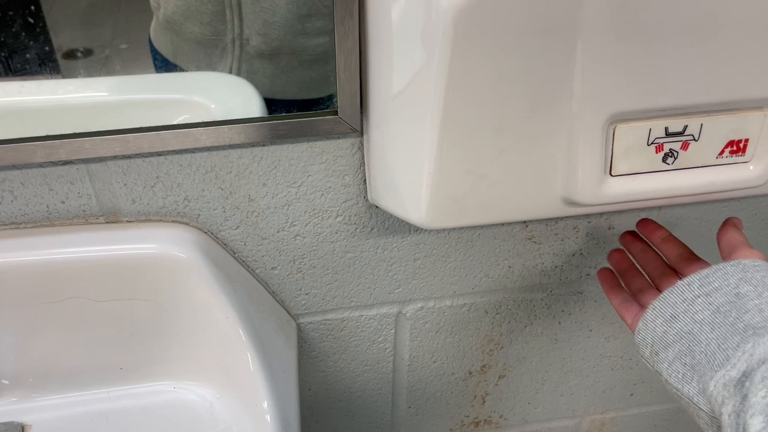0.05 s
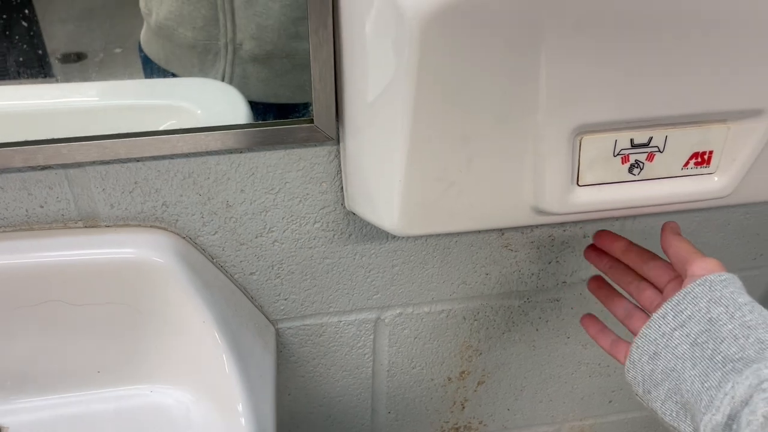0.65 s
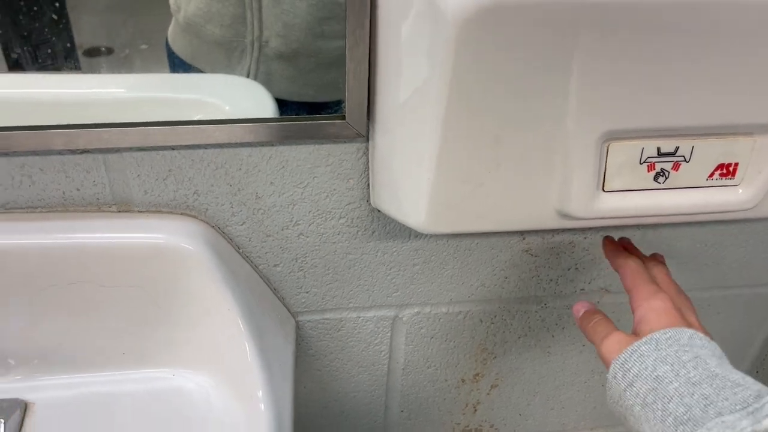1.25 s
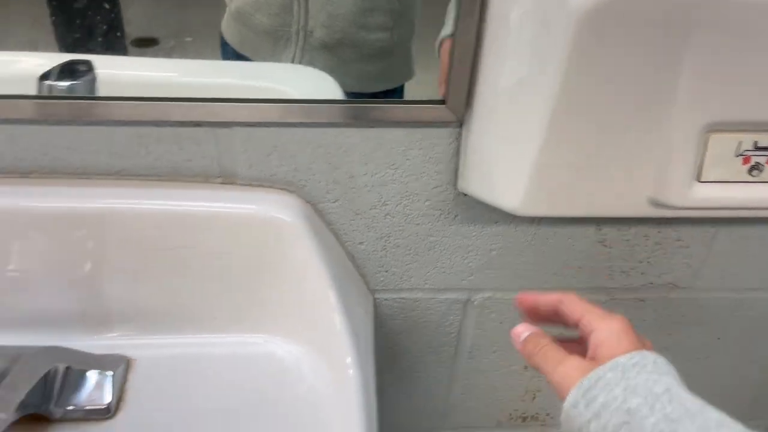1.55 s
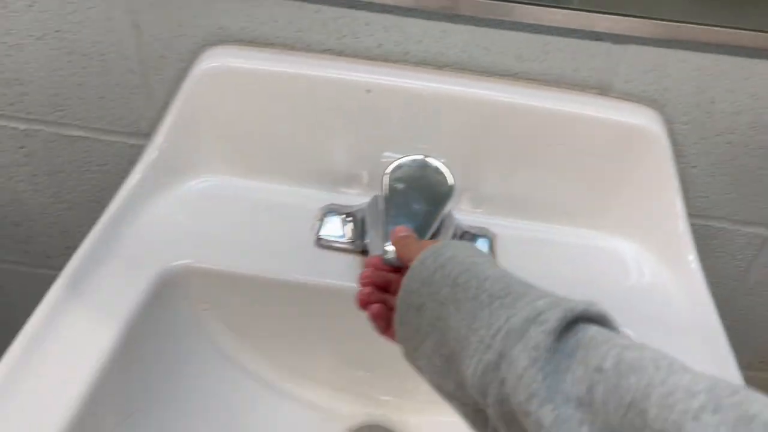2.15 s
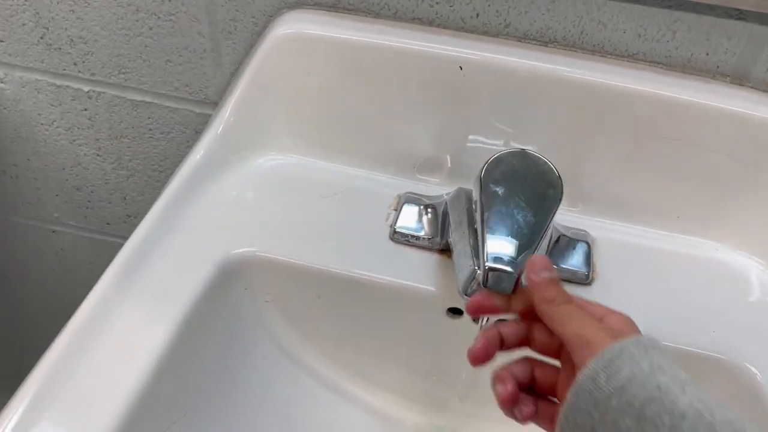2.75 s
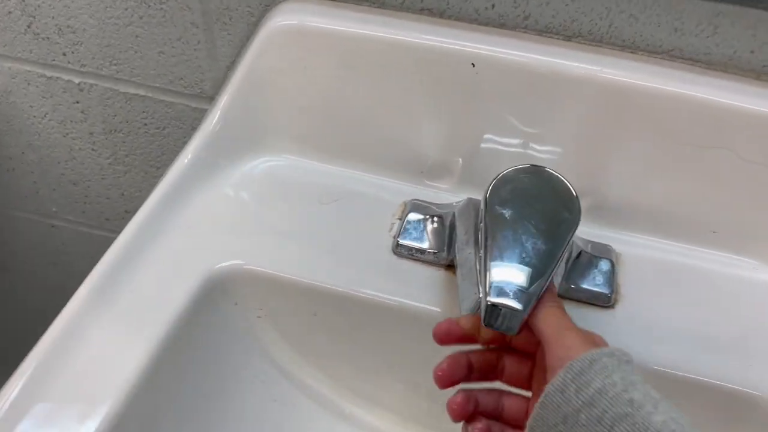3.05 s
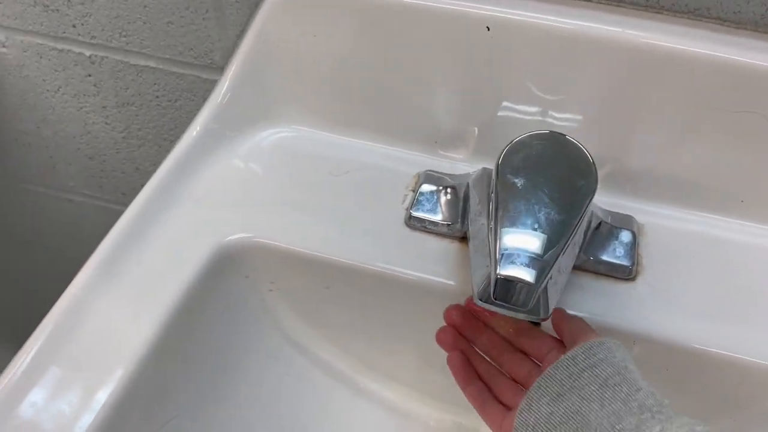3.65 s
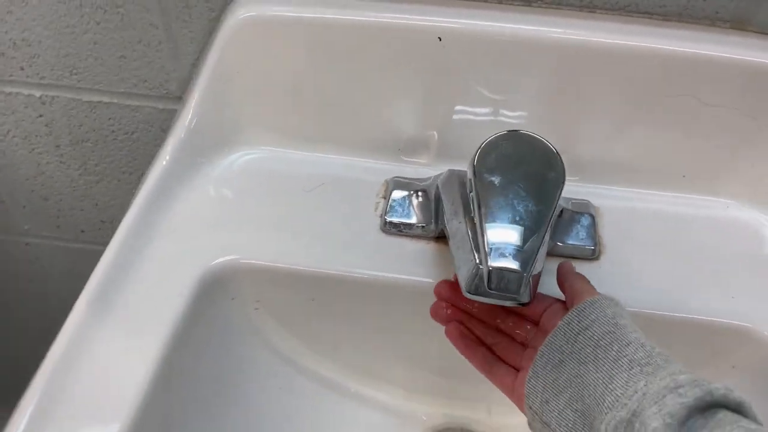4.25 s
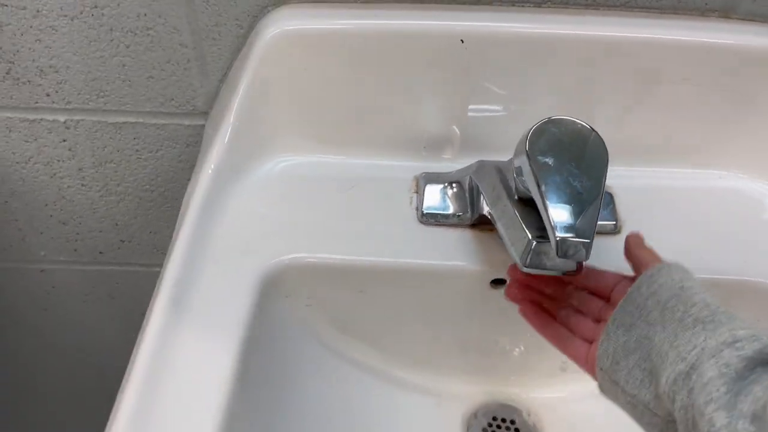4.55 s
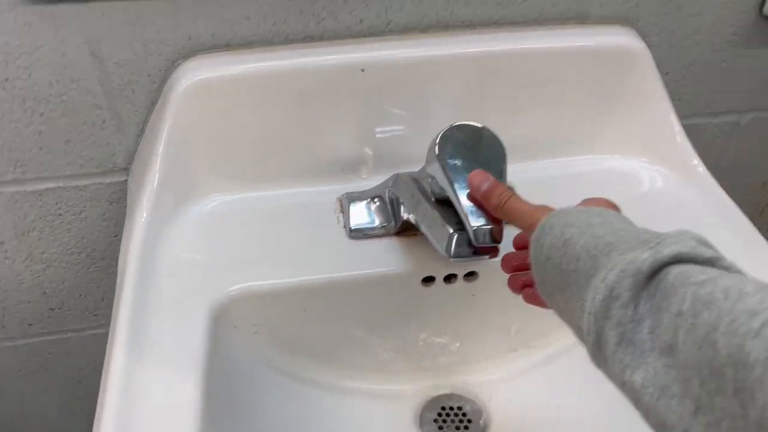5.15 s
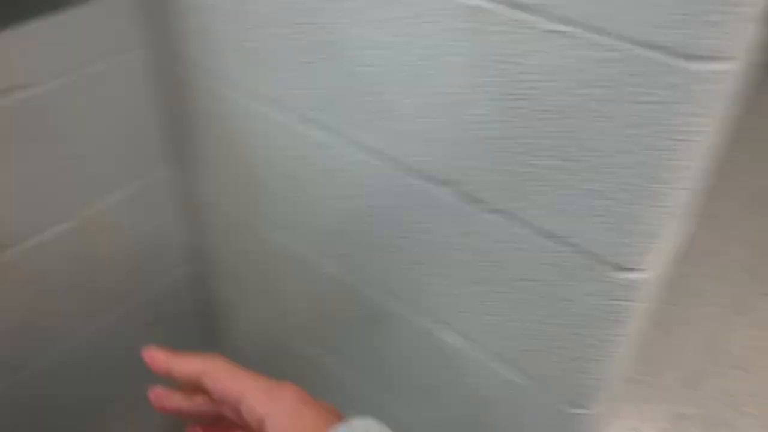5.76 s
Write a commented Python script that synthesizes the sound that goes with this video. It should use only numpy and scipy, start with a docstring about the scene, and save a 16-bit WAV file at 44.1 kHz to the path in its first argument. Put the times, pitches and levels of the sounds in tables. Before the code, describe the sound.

A wall-mounted hand dryer runs in a tiled restroom, a loud steady roar of air with a piercing whine and motor hum. The tones swell and fade as the microphone moves to the sink. After about four seconds the power cuts and the fan winds down, falling in pitch. A tap hisses faintly for a moment, and a few soft low bumps jolt the microphone near the end.

```python
"""A hand dryer roars in a tiled restroom: turbulent air, a whine from 24 fan blades, motor hum and buzz.
The tones swell and fade as the microphone crosses standing waves on its way to the sink.
At 4.4 s the power cuts; the fan coasts down and its tones slide through room and housing resonances.
A tap hisses briefly through its aerator; a few low bumps jolt the microphone as its holder turns to go."""
import sys
import numpy as np
from scipy import signal
from scipy.fft import rfft, irfft
from scipy.io import wavfile
from scipy.ndimage import uniform_filter1d

SR = 44100
rng = np.random.default_rng(int(sys.argv[2]) if len(sys.argv) > 2 else 0)


def persist_wave(psi):
    """Save psi, clipped to +-1, as 16-bit WAV."""
    counts = np.round(np.clip(psi, -1, 1) * 32767).astype(np.int16)
    wavfile.write(sys.argv[1], SR, np.atleast_2d(counts).T)


N = 265041
TIME = np.arange(N) / SR
BLADES = 24
POWER_OFF_S, MOVE_START_S, MOVE_END_S, LEAVE_S = 4.405, 1.38, 2.1, 5.9

# air spectrum, full speed: f/Hz, relative level/dB
ROAR_DB = [(25, -44), (50, -15), (110, -3), (230, -2), (700, -2.5), (900, -3), (1350, -4.5), (1800, -12.5),
           (3000, -6), (4800, -13), (6900, -15), (9600, -19), (11500, -25), (13500, -29)]
# air spectrum, nearly stopped: f/Hz, relative level/dB
DRAUGHT_DB = [(25, -40), (55, -10), (90, -8), (150, -16), (300, -8), (700, -15.5), (1250, -16),
              (1700, -21.5), (2600, -24.5), (3600, -22), (5000, -29), (8300, -35), (10500, -33),
              (13500, -47)]
# room and housing resonances, full speed: f/Hz, width/Hz, gain/dB
ROAR_PEAKS = [(94.6, 7.5, 6), (109.5, 14.5, -10.5), (177, 14.6, -4), (192, 7.5, 7), (213, 15, -4),
              (265.5, 16, 5), (284, 9.5, 1), (394, 14, 5), (453, 53, 3), (890, 83, 2), (3290, 120, -1),
              (3600, 170, 3), (4060, 110, 3.5)]
# room and duct resonances, nearly stopped: f/Hz, width/Hz, gain/dB
DRAUGHT_PEAKS = [(140, 20, 6.5), (385, 30, -4), (1980, 260, 6), (2980, 470, 6.5), (3930, 200, 4),
                 (4270, 150, 4), (5740, 930, 7), (9300, 820, 6)]
# housing peaks and dips, any speed: f/Hz, width/Hz, gain/dB
HOUSING_PEAKS = [(430, 40, 2.5), (560, 90, 1.5), (685, 60, -3), (885, 50, 1.5), (1090, 35, 2),
                 (1185, 70, -3.5), (1255, 50, 3.5), (1345, 60, 1.5), (1435, 40, 3.5)]
# air colour change at the sink: f/Hz, gain/dB
SINK_TINT_DB = [(200, 0), (290, 0), (430, -2.5), (600, 0.5), (900, 0.85), (1800, -1), (4000, -1.5),
                (6500, 1.7), (12000, -0.5)]
# shaft speed under power: t/s, f/Hz
SHAFT_HZ = [(0, 143.85), (.3, 144.12), (.8, 144.12), (1.35, 144.0), (1.55, 143.9), (2.0, 143.85),
            (2.7, 144.05), (3.2, 143.95), (4.4, 143.95)]
# blade tone across standing waves: t/s, level/dB
WHINE_DB = [(0.0, -23.5), (0.22, -30.5), (0.27, -44), (0.37, -32), (0.44, -42), (0.76, -29), (0.95, -32),
            (1.06, -25), (1.18, -29.5), (1.45, -24), (1.56, -18.5), (1.73, -31.5), (1.96, -38.5),
            (2.08, -31), (2.17, -28), (2.31, -39), (2.46, -29), (2.56, -40), (2.82, -31), (2.86, -38.5),
            (2.96, -31.5), (3.03, -37), (3.17, -29), (3.32, -26.5), (3.95, -26.5), (4.03, -36.5),
            (4.42, -36.5)]
# blade tone balance: t/s, left-right/dB
WHINE_PAN_DB = [(0.0, 0), (1.35, -4.5), (1.77, 16), (1.83, 21), (2.29, -1), (2.33, 4), (3.98, 1),
                (4.04, 26), (4.42, 21)]
# ninth shaft harmonic, singing in the housing: t/s, level/dB
SING_DB = [(0, -37), (.25, -37), (.8, -42), (1.05, -36.5), (1.3, -34), (1.6, -37.5), (2.0, -51),
           (2.3, -40.5), (2.55, -45), (2.8, -41), (3.05, -46), (3.85, -48), (4.4, -44)]
# shaft harmonic envelope: f/Hz, level/dB
COMB_DB = [(430, -55), (1100, -60), (1800, -63), (2600, -68), (3900, -50), (4600, -68), (5800, -52.5),
           (7400, -66), (9500, -59), (11000, -70)]
# prominent shaft harmonics: order, dryer level/dB, sink level/dB
STRONG_HARMONICS = [(4, -52, -46), (5, -45.5, -50), (6, -44.5, -43.5), (13, -55, -57), (23, -51, -52),
                    (25, -53, -55), (28, -52, -55), (29, -47, -52), (33, -52, -58), (37, -52, -58),
                    (42, -50, -54), (45, -53, -45), (46, -50, -60), (74, -59, -59)]
# lower buzz tone across standing waves: t/s, level/dB
LOW_BUZZ_DB = [(0, -44), (.2, -38), (.45, -48), (.9, -36), (1.2, -41), (1.9, -42), (2.05, -36.5),
               (2.17, -36.5), (2.27, -47), (2.42, -35), (2.65, -34), (2.95, -41.5), (3.9, -38), (4.13, -51),
               (4.42, -35.5)]
# upper buzz tone, likewise: t/s, level/dB
HIGH_BUZZ_DB = [(0, -52), (.55, -44), (1.55, -48), (1.8, -39.5), (2.0, -47), (2.17, -39), (2.5, -48),
                (2.73, -39.5), (2.9, -53), (3.38, -53), (3.55, -38.5), (3.73, -45), (3.92, -38.5),
                (4.4, -50)]
# room and housing resonances swept while coasting: f/Hz, width per pass/Hz, gain/dB
SWEPT_PEAKS = [(86, 3, 10.5), (94.5, 4, 11), (135, 8, 4), (1320, 105, 2), (2830, 150, 3.5), (3230, 720, 6)]
# tap stream: t/s, level/dB
TAP_DB = [(4.5, -90), (4.68, -48.5), (5.0, -49.5), (5.25, -53), (5.5, -58), (5.7, -90)]
# aerator hiss bands: f/Hz, base width/Hz, relative level/dB
AERATOR_BANDS = [(4320, 150, 2.5), (5770, 400, -4), (6670, 250, -5)]
# microphone bumps: t/s, envelope peak/dB, f/Hz
JOLTS = [(5.603, -37, 60), (5.669, -37, 75), (5.725, -33, 58), (5.752, -34, 80), (5.809, -35, 80),
         (5.842, -44, 65), (5.875, -42, 60)]
# microphone pair likeness: f/Hz, coherence/0-1
PAIR_COHERENCE = [(60, .97), (160, .93), (300, .58), (700, .3), (1700, .33), (2400, .65), (4600, .74),
                  (6000, .4), (7200, .93), (10500, .9), (13500, .7)]
# microphone pair phase: f/Hz, left lead/rad
PAIR_LEAD_RAD = [(60, 0), (200, -.1), (600, -.9), (1500, -1.0), (2200, .2), (3000, .8), (4300, 0),
                 (5300, -.2), (6200, -1.7), (6800, -2.9), (7600, -3.2), (8400, -3.9), (10500, -6.1),
                 (12000, -6.5), (13500, -8.8)]
# microphone pair balance: f/Hz, left-right/dB
PAIR_BALANCE_DB = [(60, 3), (95, -1), (135, -12), (220, 0), (360, 3.5), (700, 0), (1200, 2), (1800, 1),
                   (2500, 3.5), (6400, 4), (6900, -2), (13000, 1)]


def air(ripple_db=1.5, eddy_db=0.5, flutter_db=0.57, calm_speed=0.17):
    """Turbulent air from the nozzle fills the room; it turns hollow as the fan slows."""
    frames, hz = N // 1024 + 5, np.fft.rfftfreq(4096, 1 / SR)
    t = np.arange(frames) * 1024 / SR
    slowed = np.clip((1 - coasting(t)) / (1 - calm_speed), 0, 1)[:, None]
    roar_db = at_hz(ROAR_DB, hz) + peaks_db(ROAR_PEAKS, hz)
    draught_db = at_hz(DRAUGHT_DB, hz) + peaks_db(DRAUGHT_PEAKS, hz)
    colour_db = (1 - slowed) * roar_db + slowed * draught_db + peaks_db(HOUSING_PEAKS, hz)
    colour_db += by_place(0, 1, t)[:, None] * at_hz(SINK_TINT_DB, hz)
    # standing waves: fine, slow ripples; eddies: broad, brief patches
    ripples, eddies = rng.standard_normal((2, frames, len(hz)))
    colour_db += ripple_db * blur(ripples, frames=40, bins=2)
    colour_db += eddy_db * blur(eddies, frames=3, bins=60)
    shape = gain(colour_db)
    shape /= np.linalg.norm(shape[:, (hz > 300) & (hz < 2600)], axis=1, keepdims=True)
    real, imag = rng.standard_normal((2, 2, len(hz), frames))
    noise = signal.istft((real + 1j * imag) * shape.T, nperseg=4096, noverlap=3072)[1][:, :N]
    return mic_pair(*noise) * gain(air_gain_db() + flutter_db * drift(49))


def air_gain_db(db_per_decade=33.5, leave_db_per_s=17, room_lag_s=0.019):
    """The air weakens with distance and falling fan speed; the room holds it a moment."""
    slowing_db = db_per_decade * np.log10(coasting(TIME - room_lag_s))
    leaving_db = leave_db_per_s * np.maximum(TIME - LEAVE_S, 0)
    return by_place(dryer=-23.5, sink=-26) + slowing_db - leaving_db


def whine(turns, stray_db=-36, linger_db=-41):
    """Blades pass the housing: one piercing tone, shaken by the turbulent intake."""
    cycles = BLADES * turns
    balance = pan(at_time(WHINE_PAN_DB))
    direct = gain(at_time(WHINE_DB)) * balance / balance.mean(0) * room_tone(cycles, 0.15, rate_hz=28)
    # side-wall reflections arrive in antiphase
    stray = gain(stray_db) * room_tone(cycles, 5.6, rate_hz=4.3)[0] * np.array([[1], [-1]])
    linger = gain(linger_db) * room_tone(cycles, 0.79, rate_hz=8.2) * after_cut(rise_s=0.075)
    return (direct + stray + linger) * ring_out(t60_s=1.55)


def motor(turns, mains_hz=60):
    """Rotor hum once a turn, shaft harmonics, and magnetic buzz at multiples of the mains rate."""
    hum_db = by_place(dryer=-29, sink=-36.5)
    hum = gain(hum_db) * room_tone(turns, 0.12, rate_hz=7)[0] * pan(-0.5)
    sing = gain(at_time(SING_DB)) * room_tone(9 * turns, 0.6, rate_hz=24) * pan(4)
    buzz = sum(gain(at_time(curve)) * room_tone(order * mains_hz * TIME, 0.2, rate_hz=3)
               for order, curve in ((4, LOW_BUZZ_DB), (10, HIGH_BUZZ_DB)))
    comb = mic_pair(*shaft_comb(turns))
    return (hum + sing + comb) * ring_out(t60_s=1.2) + buzz * ring_out(t60_s=0.8)


def shaft_comb(turns):
    """Shaft harmonics 3-75 without the blade tone; the low ones waver slowest."""
    strong_db = {order: by_place(dryer, sink) for order, dryer, sink in STRONG_HARMONICS}
    comb = np.zeros((2, N))
    for order in range(3, 76):
        if order != BLADES:
            level_db = strong_db.get(order, at_hz(COMB_DB, order * SHAFT_HZ[0][1]))
            comb += gain(level_db) * room_tone(order * turns, 0.6, rate_hz=min(order / 2, 9))
    return comb


def wind_down(turns, direct_db=-39, walls_db=-37.5, hum_db=-36.5, hum_db_per_decade=28):
    """Blade tone, 15th harmonic and hum slide down and fade, swelling where they cross a resonance."""
    speed, onset = coasting(TIME), after_cut(rise_s=0.011)
    blade, lower = (room_tone(order * turns, 0.45, rate_hz=90)[0] for order in (BLADES, 15))
    slide = (blade + gain(-4) * lower) * onset * speed
    first, second = (room_tone(order * turns, 0.15, rate_hz=20)[0] for order in (1, 2))
    hum = (first + gain(-8) * second) * onset * gain(hum_db_per_decade * np.log10(speed))
    slide, hum = resonate(slide, SWEPT_PEAKS), resonate(hum, SWEPT_PEAKS)
    return gain(direct_db) * slide + gain(walls_db) * tiled_walls(slide) + gain(hum_db) * hum


def tap(spatter_db=1.0):
    """Water hisses through the aerator and spatters into the basin."""
    noise = rng.standard_normal((2, N)) * gain(spatter_db * drift(120))
    hiss = unit_rms(resonate(noise, AERATOR_BANDS, widen=1.4))
    return mic_pair(*hiss) * gain(at_time(TAP_DB))


def jolts(rise_s=0.0058):
    """Soft, low bumps through the microphone body."""
    bumps = np.zeros(N)
    for start_s, peak_db, hz in JOLTS:
        age_s = np.maximum(TIME - start_s, 0)
        envelope = age_s / rise_s * np.exp(1 - age_s / rise_s)
        bumps -= gain(peak_db) * envelope * np.sin(2 * np.pi * hz * age_s)
    return bumps


def tiled_walls(x, bass_t60_s=0.53, treble_t60_s=0.94):
    """Dense reflections of random sign, one tail per channel; the treble rings longer."""
    echoes = rng.choice([-1., 1.], (2, SR)) * (rng.random((2, SR)) < 0.06)
    hz, t, spectra = signal.stft(echoes, SR, nperseg=256)
    t60_s = at_hz([(300, bass_t60_s), (8000, treble_t60_s)], hz)[:, None]
    tail = signal.istft(spectra * gain(-60 * t / t60_s), SR, nperseg=256)[1]
    return signal.fftconvolve(x[None], tail / np.linalg.norm(tail[0]), axes=1)[:, :N]


def room_tone(cycles, scatter, rate_hz):
    """A direct tone plus shifting reflections of relative size scatter; two channels, unit rms."""
    phase = 2 * np.pi * (cycles + rng.random())
    cos, sin = np.cos(phase), np.sin(phase)
    return np.array([unit_rms(cos + scatter * (drift(rate_hz) * cos + drift(rate_hz) * sin))
                     for _ in range(2)])


def mic_pair(left, independent):
    """Two ports, most alike in bass and treble; phase and balance vary with frequency."""
    hz = np.fft.rfftfreq(N, 1 / SR)
    coherence = np.clip(at_hz(PAIR_COHERENCE, hz), 0, 1)
    left = rfft(left)
    right = coherence * left + np.sqrt(1 - coherence ** 2) * rfft(independent)
    right *= np.exp(-1j * at_hz(PAIR_LEAD_RAD, hz))
    return irfft(np.array([left, right]) * pan(at_hz(PAIR_BALANCE_DB, hz)), N)


def coasting(t, drag_halving_s=0.52, friction_per_s=0.045):
    """Fraction of full speed; air drag and friction brake the fan after the cut."""
    age_s = np.maximum(t - POWER_OFF_S, 0)
    return 1 / (1 + age_s / drag_halving_s) - friction_per_s * age_s


def ring_out(t60_s):
    """Room decay of a steady tone after the cut."""
    return gain(-60 * np.maximum(TIME - POWER_OFF_S, 0) / t60_s)


def after_cut(rise_s):
    """Fade-in from the power cut."""
    return np.clip((TIME - POWER_OFF_S) / rise_s, 0, 1)


def by_place(dryer, sink, t=TIME):
    """Crossfades a value as the microphone moves."""
    return np.interp(t, [MOVE_START_S, MOVE_END_S], [dryer, sink])


def resonate(x, bands, widen=1):
    """Parallel resonances, two passes each for steep skirts."""
    total = 0
    for hz, width_hz, db in bands:
        b, a = signal.iirpeak(hz, hz / (widen * width_hz), SR)
        total += gain(db) * signal.lfilter(b, a, signal.lfilter(b, a, x))
    return total


def peaks_db(rows, hz):
    """Sum of bell-shaped peaks and dips."""
    return sum(db / (1 + (2 * (hz - centre_hz) / width_hz) ** 2) for centre_hz, width_hz, db in rows)


def drift(rate_hz):
    """Random wander, unit rms, low-passed at rate_hz."""
    hz = np.fft.rfftfreq(4096, TIME[-1] / 4096)
    smooth = irfft(rfft(rng.standard_normal(4096)) / (1 + (hz / rate_hz) ** 4))
    return np.interp(TIME, np.linspace(0, TIME[-1], len(smooth)), unit_rms(smooth))


def blur(x, frames, bins):
    """Time-frequency smoothing to unit rms."""
    return unit_rms(uniform_filter1d(uniform_filter1d(x, frames, axis=0), bins, axis=1))


def at_hz(rows, hz):
    """Interpolates on a log-frequency axis."""
    knots_hz, values = np.transpose(rows)
    return np.interp(np.log(hz + 1), np.log(knots_hz + 1), values)


def at_time(rows):
    return np.interp(TIME, *np.transpose(rows))


def pan(left_right_db):
    return gain(np.array([[0.5], [-0.5]]) * left_right_db)


def gain(db):
    return 10 ** (np.asarray(db) / 20)


def unit_rms(x):
    return x / np.sqrt(np.mean(x ** 2) + 1e-20)


def scene(wobble=0.00029):
    """Air roar over the tones of one shaft; then coast-down, tap and bumps."""
    shaft_hz = at_time(SHAFT_HZ) * (1 + wobble * drift(14.4))
    powered_turns = np.cumsum(shaft_hz) / SR
    coasting_turns = np.cumsum(shaft_hz * coasting(TIME)) / SR
    dryer = air() + whine(powered_turns) + motor(powered_turns) + wind_down(coasting_turns)
    return dryer + tap() + jolts()


def record(dry):
    """Low-pass at 13.5 kHz."""
    lowpass = signal.firwin(511, 13500, window=("kaiser", 9), fs=SR)
    return signal.oaconvolve(dry, lowpass[None], "same")


dry = scene()
out = record(dry)
persist_wave(out)
```